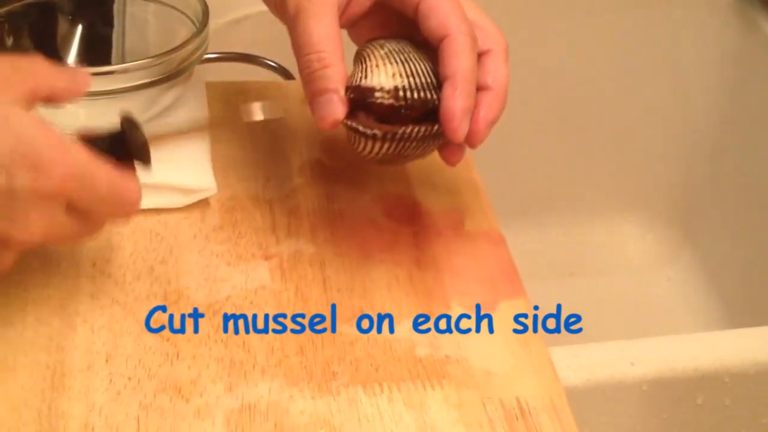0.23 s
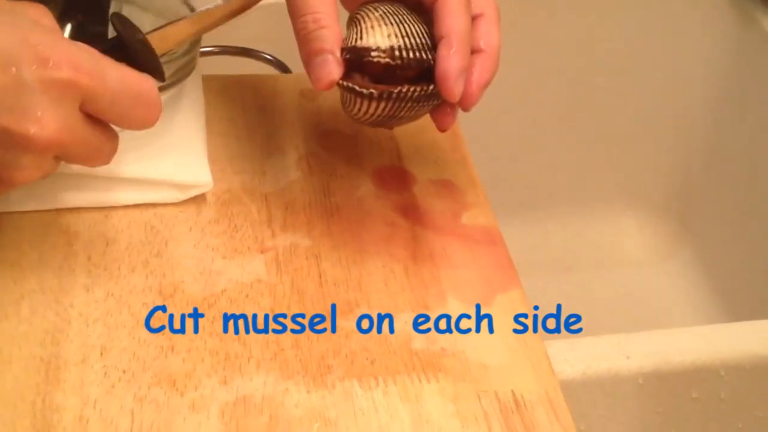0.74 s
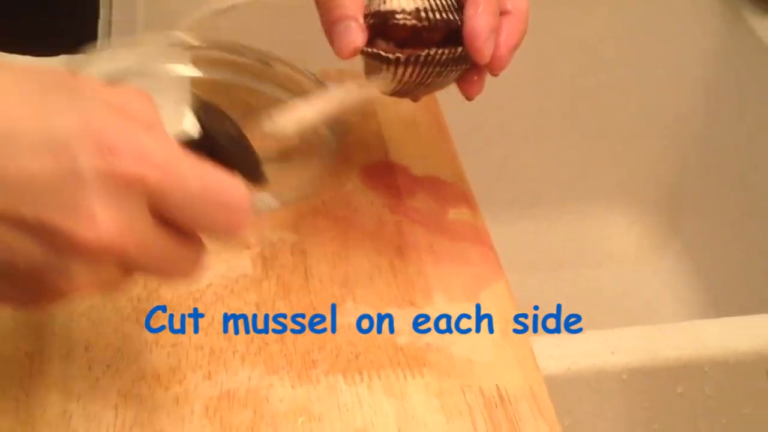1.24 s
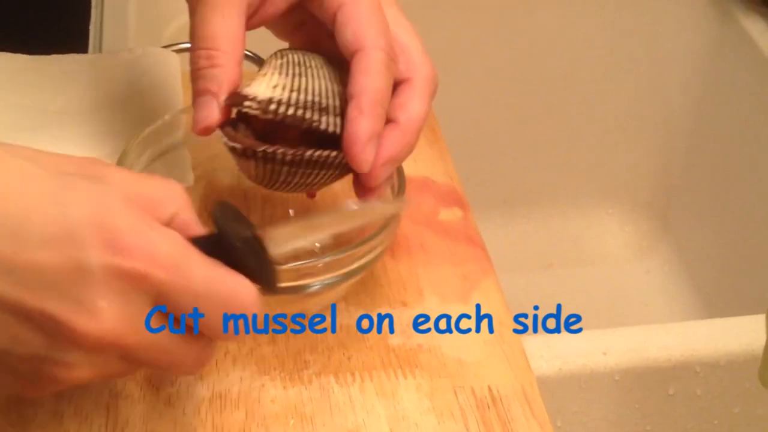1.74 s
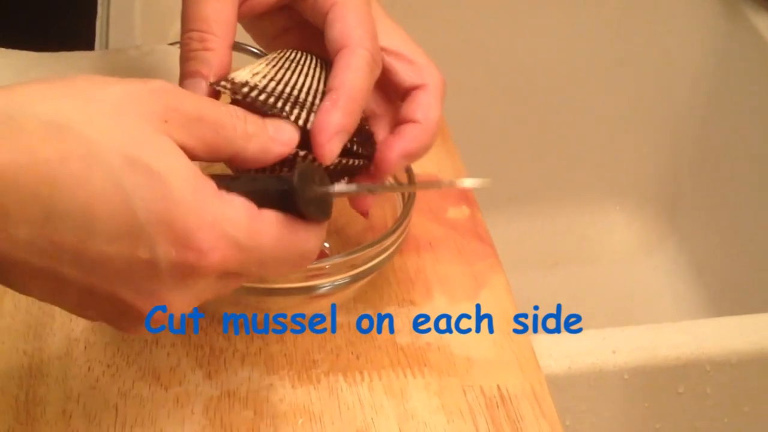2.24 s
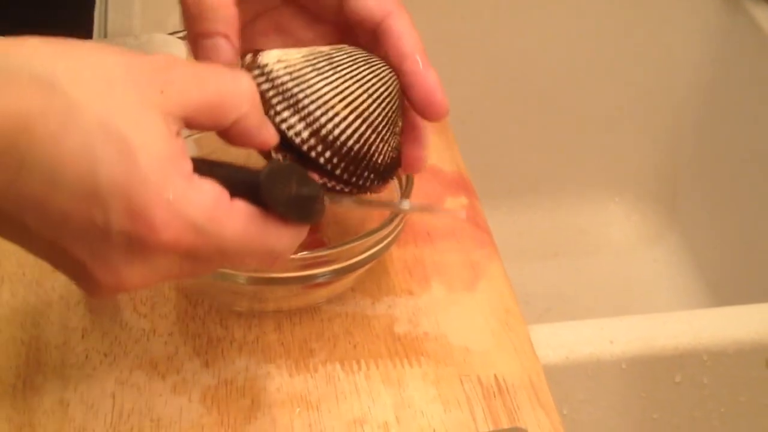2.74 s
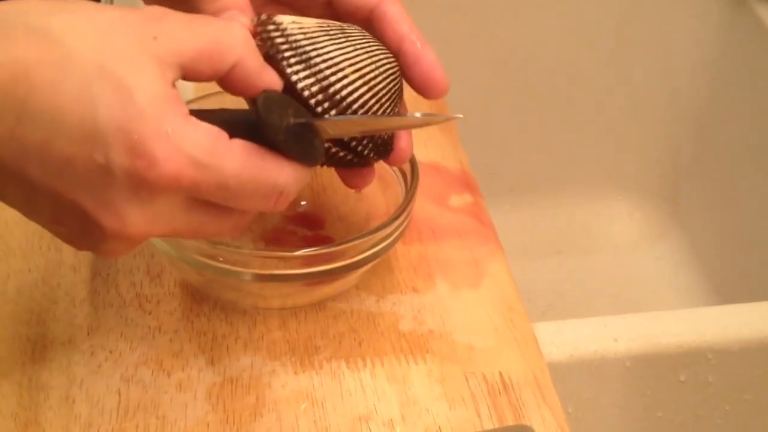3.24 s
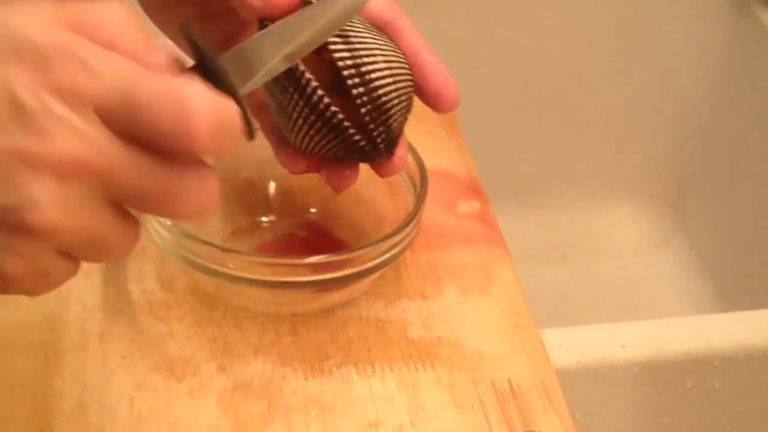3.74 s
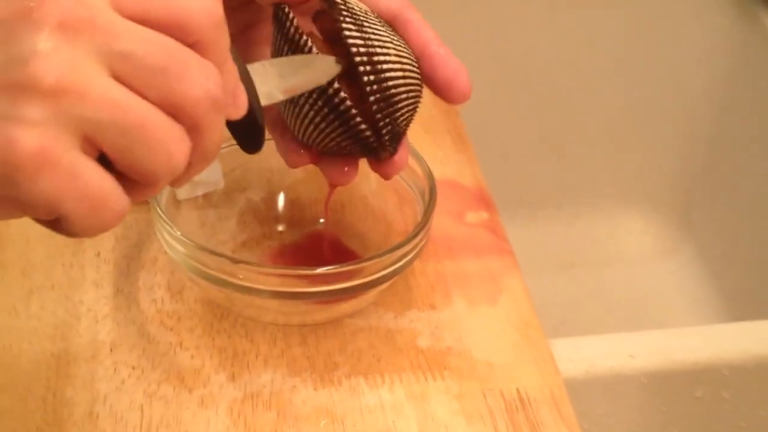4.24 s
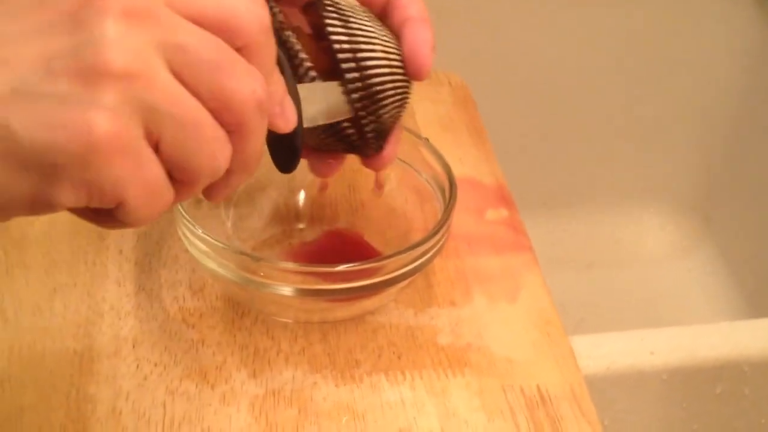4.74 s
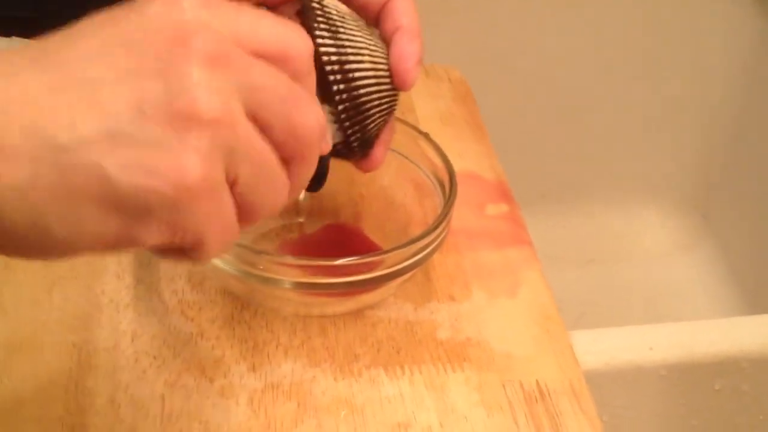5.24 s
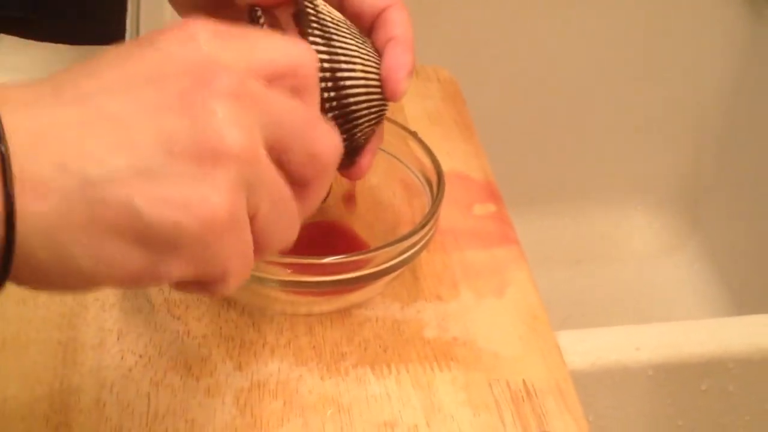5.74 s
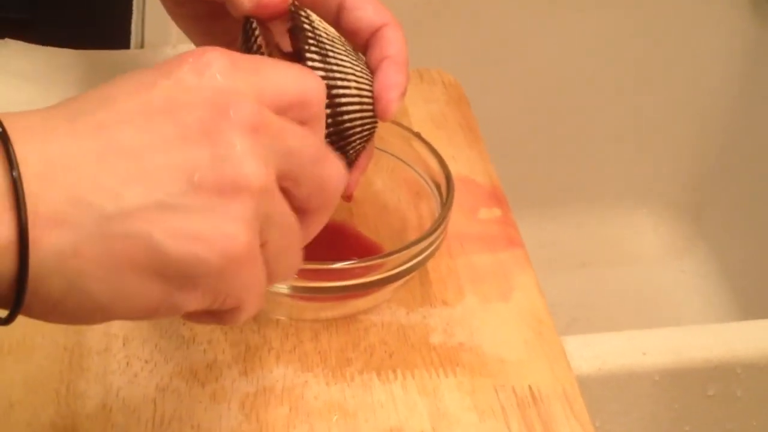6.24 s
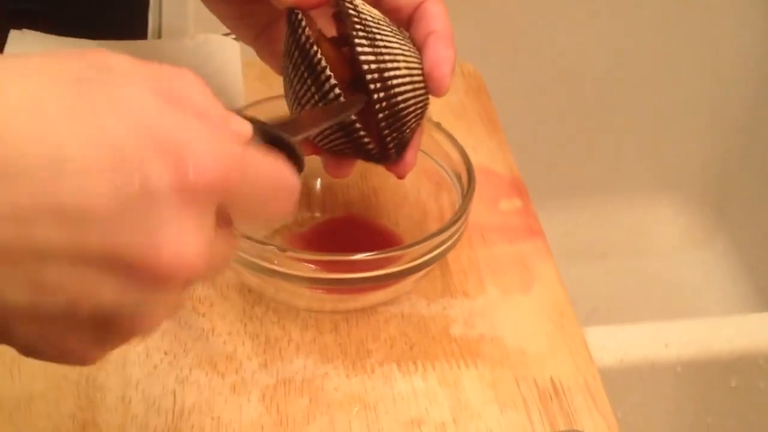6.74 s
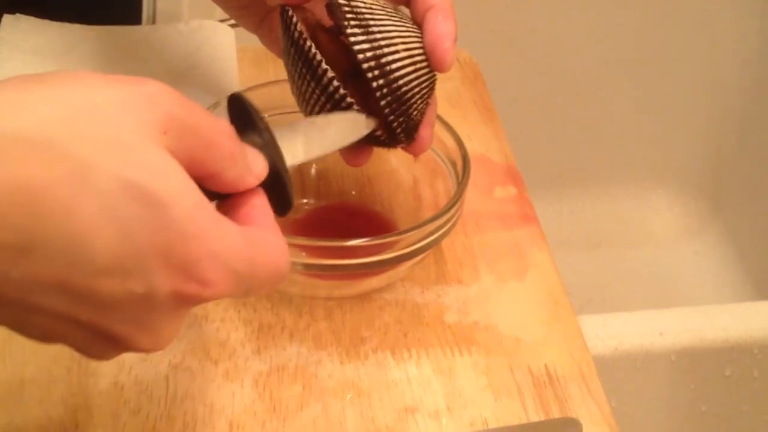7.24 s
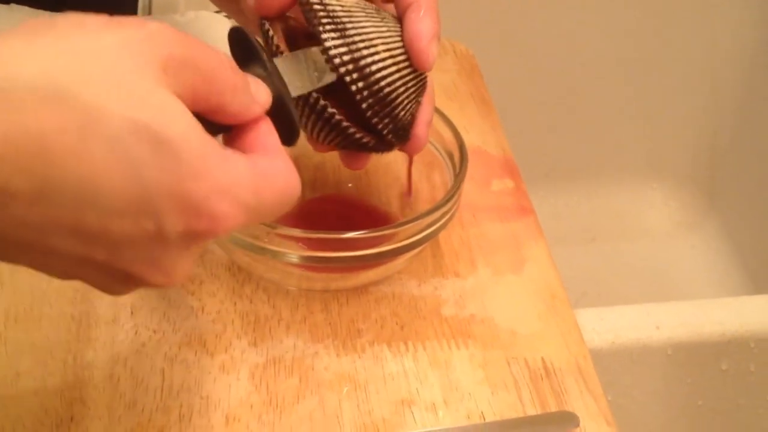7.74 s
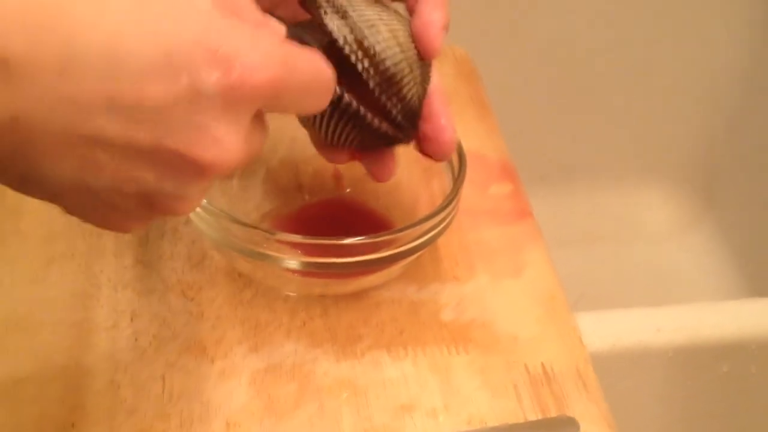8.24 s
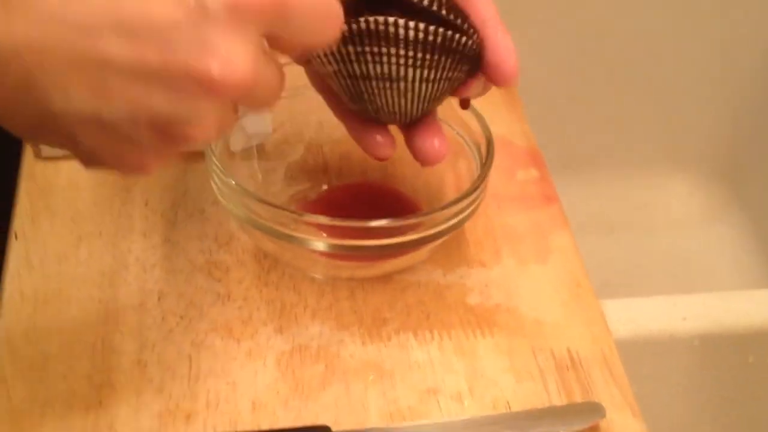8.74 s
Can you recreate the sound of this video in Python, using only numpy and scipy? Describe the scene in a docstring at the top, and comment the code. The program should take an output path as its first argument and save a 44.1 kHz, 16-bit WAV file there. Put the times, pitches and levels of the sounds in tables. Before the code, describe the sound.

In a quiet kitchen with a faint appliance hum, a knife taps a clam shell once. A glass bowl knocks twice on a wooden board and rings briefly. After a few tiny wet ticks, the blade grates softly into the shell and slips off its ribs in sharp, irregular clicks, with another bowl knock midway. The clicks peak in a quick cluster near the end, then a few light taps fade. Everything sounds close.

```python
"""A ribbed clam is cut open with an oyster knife over a glass bowl on a wooden board, in a quiet kitchen.
Over the hum of an appliance, the blade taps the shell's lip. The bowl knocks twice on the board, and wet
flesh ticks faintly. From about 4.6 s the blade grates through the gap between the valves and slips off
their ribs in sharp clicks that ring the shell; midway the bowl knocks a third time. The clicks peak just
after 8 s, the valve's ring drops as the muscle is cut, and a few last taps fade away."""
import sys
import numpy as np
from scipy import signal
from scipy.fft import rfft, irfft
from scipy.io import wavfile

SR = 44100
rng = np.random.default_rng(int(sys.argv[2]) if len(sys.argv) > 2 else 0)


def dump(signal):
    """Clip the signal to [-1, 1] and save it as 16-bit WAV at the path in sys.argv[1]."""
    limited = np.clip(np.atleast_2d(signal).T, -1, 1)
    pcm = np.round(limited * 32767).astype(np.int16)
    wavfile.write(sys.argv[1], SR, pcm)


N = 396900

# The tone colour of steel on shell. Each row: frequency in Hz, level in dB.
STEEL_ON_SHELL = [(100, -47), (500, -28), (900, -5), (1400, -4.5), (2100, -9), (3000, 3.5), (3750, -2),
                  (4700, 5), (5600, -3.5), (6700, 2.5), (7900, -3.5), (9000, -9), (10500, -6),
                  (13300, -7.5), (16000, -23)]
# The shell's resonances. Each row: pitch in Hz, level in dB, ring time (t60) in seconds.
SHELL_MODES = [(1800, -8, 0.048), (2140, 6, 0.0045), (2420, 3.5, 0.011), (3010, 9, 0.01),
               (4200, -10.5, 0.013), (4620, -9.5, 0.0088), (6310, -13, 0.0085), (6200, 1.5, 0.015),
               (7700, -18.5, 0.016)]


def slips(valve_db=-1, blade_db=-5, valve_cycles=29, blade_cycles=30):
    """The blade slips off a rib inside the gap, ringing valve and blade at pitches set by the grip."""
    # Each row: start in seconds, contact energy in dB, treble lift in dB, slide time in seconds,
    # relative valve ring in dB.
    rib_slips = [(4.664, -20, 4, 0.0038, -29), (4.687, -23.5, 4, 0.002, -22.5),
                 (4.8047, -22.5, 4, 0.0071, -19), (4.904, -21, -10, .003, -17.5),
                 (5.0174, -31, 4, .002, -38), (5.323, -15.5, 7.5, 0.0058, -16),
                 (5.4328, -19.5, -8, 0.0026, -15), (5.553, -15.5, -3, 0.0041, -17),
                 (5.6478, -18, 5.5, 0.0027, -9.5), (5.699, -23.5, -27, 0.0028, -16),
                 (5.7748, -12.5, 2, 0.0038, -3.5), (5.9199, -20, -8, .0026, -22.5),
                 (6.045, -21.5, -5.5, 0.0043, -18.5), (6.158, -18, 0, .008, -12.5),
                 (6.2815, -17.5, -8, 0.0045, -12), (7.0336, -33.5, -2, .0046, -51),
                 (7.547, -23.5, 5, 0.0095, -20.5), (7.575, -21.5, -3, 0.0032, -34),
                 (7.7, -17.5, 7.5, 0.01, -18.5), (7.7433, -10, 6.5, 0.0041, -8.5),
                 (7.769, -10.5, -1, 0.0022, -2), (7.812, -15, -3.5, 0.0024, -7),
                 (8.0442, -6, -8.5, 0.0071, 2.5), (8.0604, -7.5, -19, 0.0063, 4),
                 (8.0756, -1, 7, 0.0053, -8), (8.0868, 6, 2, 0.0048, -25), (8.1828, -7.5, 3, 0.0025, -17),
                 (8.5282, -12.5, -3, 0.0024, -24.5), (8.5554, -20.5, 5, .001, -41)]
    # The blade works round the shell; the valve's pitch drops once the muscle is cut.
    # Each row: time in seconds, valve pitch in Hz, blade pitch in Hz.
    grip = [(4.65, 1910, 5960), (5.55, 1796, 6250), (6.2, 1830, 6430), (7.58, 1930, 6360),
            (7.77, 1786, 8000), (8.05, 1773, 7300), (8.18, 1440, 7270), (8.53, 1350, 6280)]
    times, valve_hz, blade_hz = np.transpose(grip)
    out = np.zeros(N)
    for start, energy_db, lift_db, slide_s, ring_db in rib_slips:
        valve = damped_note(np.interp(start, times, valve_hz), valve_cycles)
        blade = damped_note(np.interp(start, times, blade_hz), blade_cycles)
        notes = [(ring_db + valve_db, valve), (energy_db + blade_db, blade)]
        add(out, start, click(energy_db, lift_db, slide_s, notes))
    return out


def taps(lip_db=-1, blade_db=-3, lip_cycles=22, dull_share=0.18, contact_s=0.0029):
    """The blade strikes the shell's free lip from outside and both ring; a dull tap rings the blade less."""
    # Each row: start in seconds, contact energy in dB, treble lift in dB, lip pitch in Hz,
    # relative lip ring in dB.
    lip_taps = [(0.0526, -10.5, 1.5, 3020, -20), (6.2065, 1.5, 0, 3455, 1.5), (6.552, -34.5, 1, 2900, -23),
                (8.355, -19, -22, 2620, -16), (8.406, -8, -9.5, 2660, -14), (8.736, -24, -2.5, 2390, -15.5),
                (8.823, -40, -14, 2180, -29.5)]
    # The blade, clear of the flesh. Each row: pitch in Hz, level in dB, ring time in seconds.
    blade_modes = [(4020, 1, 0.0026), (6160, -0.5, 0.006)]
    out = np.zeros(N)
    for start, energy_db, lift_db, lip_hz, ring_db in lip_taps:
        blade = ring(blade_modes, .02, 0.000067)
        lip = damped_note(lip_hz, lip_cycles)
        notes = [(ring_db + lip_db, lip), (energy_db + blade_db + dull_share * lift_db, blade)]
        add(out, start, click(energy_db, lift_db, contact_s, notes))
    return out


def click(energy_db, lift_db, slide_s, notes, shell_db=-7, bite_s=.001):
    """A spray of fractures, heard directly, through the shell and through the notes (dB, ring) it shakes."""
    t = np.arange(SR // 12) / SR
    spray = grit(len(t), per_s=14000, spread_db=1.5)
    spray *= np.exp(-t / (2 * slide_s)) * (1 - np.exp(-t / bite_s))
    contact = pulse(STEEL_ON_SHELL, lambda hz: lift_db * np.clip((hz - 6000) / 4500, 0, 1))
    shell = ring(SHELL_MODES, .06, 0.00051)
    paths = [(energy_db, contact), (energy_db + shell_db, shell)] + notes
    return sum(gain_of(db) * unit(signal.fftconvolve(spray, body)[:len(t)]) for db, body in paths)


def grating(level_db=-4.5, shell_db=-2, valve_db=-6, valve_hz=1920, valve_cycles=16, chip_cycles=16):
    """The edge drags through the gap: chips break off, each with a brief pitch, and shake shell and valve."""
    # Pushes of the blade. Each row: start in seconds, length in seconds, relative level in dB.
    pushes = [(4.578, .05, -53.5), (4.615, .11, -52), (4.612, 0.8, -58.5), (4.858, 0.14, -46.5),
              (5.087, 0.11, -50.5), (5.181, 0.044, -43.5), (5.325, 0.052, -41.5), (5.482, 0.24, -55.5),
              (5.752, 0.1, -45), (6.16, 0.07, -38), (7.091, 0.082, -46), (7.752, 0.089, -44),
              (8.015, .04, -52), (8.055, 0.048, -30.5), (8.91, 0.15, -55)]
    pressure = sum(gain_of(db) * swell(start, length) for start, length, db in pushes)
    chips = np.zeros(N)
    for hz in np.geomspace(1900, 14500, 14):
        fractures = grit(N, per_s=400, spread_db=3.5)
        chip = ring([(hz, 0, chip_cycles / hz)], .02, 1 / hz)
        chips += gain_of(curve_at(STEEL_ON_SHELL, hz)) * np.sqrt(hz) * signal.oaconvolve(fractures, chip)[:N]
    out = pressure * evened(chips)
    shell = ring(SHELL_MODES, .1, .0001)
    valve = damped_note(valve_hz, valve_cycles)
    for db, body in [(shell_db, shell), (valve_db, valve)]:
        scrape = pressure * grit(N, per_s=2000, spread_db=3.1)
        out += gain_of(db) * signal.oaconvolve(scrape, body)[:N]
    return gain_of(level_db) * out


def bowl(rock_t60=0.018, rock_db=-1, crack_db=-13, thud_db=-11, chatter_s=0.006):
    """The bowl touches with one edge, lands fully and chatters to rest; glass and board ring on."""
    # Each row: start in seconds, relative touch level in dB, touch pitch in Hz, landing delay in seconds,
    # landing level in dB, hardness in dB per octave, board ring in dB, glass ring in dB.
    knocks = [(1.5467, 10.5, 1064, 0.0042, 12, 1, 6.5, -6), (1.8756, 6, 1322, 0.0042, 15, -2.5, 10, 2),
              (6.313, 5, 890, .005, 9, -1.5, 4, -0.5)]
    # A knock's force as the board passes it on. Each row: frequency in Hz, level in dB.
    thud_spectrum = [(40, -49.5), (90, -29), (170, -9.5), (230, -6.5), (400, -12.5), (530, -4.5),
                     (1000, -1.5), (1400, -0.5), (2000, -9.5), (2900, -12), (3600, -24), (6000, -33),
                     (10000, -42.5), (16000, -58.5)]
    # The board, and the glass it damps. Each row: pitch in Hz, level in dB, ring time in seconds.
    board_modes = [(195, -16.5, .2), (236.9, -13.5, 0.13), (277, -9, .2), (326, -9.5, .3), (497, -7.5, .17),
                   (568, 2.5, 0.13), (587, -3, .24), (727, -2, .19), (763, -8.5, 0.16), (976, -1, .2),
                   (989, -5.5, 0.27), (1041, -1, 0.21), (1138, -8, .22), (1425, -5, 0.16), (1440, -6, 0.18),
                   (1596, -6, .17), (1690, -8, 0.1), (2110, 2, 0.081), (2196, -12, 0.25), (2660, -11, 0.11),
                   (2885, -13, .17), (2940, -6.5, 0.11)]
    glass_modes = [(1247, 0, 0.39)]
    blows, ringing = np.zeros((2, N))
    t = np.arange(SR // 10) / SR
    for start, touch_db, touch_hz, delay, land_db, hardness, board_db, glass_db in knocks:
        thud = pulse(thud_spectrum, lambda hz: hardness * np.log2(1 + hz / 1000))
        bounces = grit(len(t), per_s=5000, spread_db=1.7) * np.exp(-t / chatter_s)
        chatter = unit(signal.fftconvolve(bounces, thud))
        add(blows, start, gain_of(touch_db + rock_db) * ring([(touch_hz, 0, rock_t60)], 0.073, 0.00046))
        add(blows, start, gain_of(touch_db + crack_db) * thud)
        add(blows, start + delay, gain_of(land_db + thud_db) * thud)
        add(blows, start + delay, gain_of(land_db) * chatter)
        add(ringing, start, gain_of(board_db) * ring(board_modes, .6, 0.004))
        add(ringing, start, gain_of(glass_db) * ring(glass_modes, .6, 0.0026))
    return blows, ringing


def flesh(film_t60=0.0048, snap_db=-3):
    """As the flesh parts, wet films burst in little clusters, each with a short high note."""
    # Each row: start in seconds, energy in dB, pitch in Hz.
    wet_ticks = [(0.3898, -35.5, 10550), (2.122, -44, 4000), (2.2427, -43, 6160), (3.114, -39, 6430),
                 (3.3334, -38, 6260), (3.3741, -43, 6400), (4.393, -28.5, 5500)]
    out = np.zeros(N)
    t = np.arange(SR // 20) / SR
    for start, db, hz in wet_ticks:
        pops = grit(len(t), per_s=1500, spread_db=2.3) * np.exp(-t / 0.0053)
        film = ring([(hz, 0, film_t60)], .03, 0.00021)
        add(out, start, gain_of(db) * unit(signal.fftconvolve(pops, film)))
        add(out, start, gain_of(db + snap_db) * unit(np.diff(pops)))
    return out


def rubbing(bend=.06):
    """Soft, grainy rubbing that narrows into a squeak where it rings; pressure bends its pitch up."""
    # Each row: start in seconds, length in seconds, level in dB, centre in Hz, ring time in seconds.
    rubs = [(0.447, 0.088, -58.5, 3550, 0.00093), (0.458, 0.5, -71.5, 4340, 0.0013),
            (6.803, .4, -75, 4900, .015), (7.14, 0.33, -69.5, 5220, .012), (7.09, 0.05, -54, 3160, 0.0076),
            (7.431, 0.059, -56, 3050, 0.019)]
    grain = grit(N, per_s=5000, spread_db=1.5)
    out = np.zeros(N)
    for start, length, db, hz, t60 in rubs:
        pressure = swell(start, length)
        pitch_hz = hz * (1 + bend * (pressure - .5))
        carrier = np.exp(2j * np.pi * np.cumsum(pitch_hz) / SR)
        feedback = np.exp(-np.log(1000) / (t60 * SR))
        squeak = carrier * signal.lfilter([1], [1, -feedback], grain / carrier)  # a gliding resonance
        out += gain_of(db) * pressure * evened(squeak.real)
    return out


def kitchen(sound, count=3, turn_hz=3.7):
    """The shell turns in the hand, so each blow meets a different blend of echoes."""
    turn = 2 * np.pi * turn_hz * np.arange(N) / SR
    blends = [np.sqrt(2 / count) * np.cos(turn + np.pi * k / count) for k in range(count)]
    return sum(signal.oaconvolve(sound * blend, reflections())[:N] for blend in blends)


def reflections(first_s=0.0016, build_s=0.002, echoes_per_s=5000):
    """Dense echoes off sink and walls, each band dying at its own speed."""
    # Each row: frequency in Hz, reverb time in seconds.
    reverb_times = [(150, 0.46), (500, .27), (1300, 0.25), (3000, 0.22), (7000, .24), (14000, 0.2)]
    echoes = rng.choice([-1., 1.], SR // 2) * (rng.random(SR // 2) < echoes_per_s / SR)
    hz, t, bands = signal.stft(echoes, SR, nperseg=256)
    decay = np.exp(-np.log(1000) * t / curve_at(reverb_times, hz)[:, None])
    tail = signal.istft(bands * decay, SR, nperseg=256)[1]
    fade_in = np.clip((np.arange(len(tail)) / SR - first_s) / build_s, 0, 1)
    return unit(tail * fade_in)


def room_tone(air_db=-58, flutter_rate_hz=45, waver_rate_hz=22):
    """A steady bed of air under the wavering, fluttering tones of an appliance motor."""
    # Each row: frequency in Hz, relative noise density in dB.
    air_spectrum = [(25, -13.5), (62, -22.5), (84, -3), (115, -8), (145, -3), (250, -1), (330, 0.5),
                    (700, -4.5), (1500, -12.5), (2600, -17), (3600, -24), (7000, -27), (10000, -33.5),
                    (14500, -28.5), (16000, -38.5)]
    # Each row: pitch in Hz, rms level in dB, waver depth in Hz, flutter as a share of the level.
    motor_tones = [(391, -63.5, 3.9, 0.22), (525, -73.5, 2.8, 0.36), (573, -75, 3, .4), (2310, -81, 4, .4),
                   (2738, -71, 11, 0.55), (4540, -88.5, 3, .3)]
    colour = gain_of(curve_at(air_spectrum, np.fft.rfftfreq(N, 1 / SR)))
    out = gain_of(air_db) * evened(irfft(rfft(rng.standard_normal(N)) * colour, N))
    for hz, db, waver, flutter in motor_tones:
        tone = np.sin(2 * np.pi * np.cumsum(hz + waver * drift(waver_rate_hz)) / SR)
        out += gain_of(db) * evened((1 + flutter * drift(flutter_rate_hz)) * tone)
    return out


def swell(start, length, peak_share=0.38, curve=1.22):
    """The pressure of one push: it builds to a peak and lets go."""
    progress = (np.arange(N) / SR - start) / length
    return np.interp(progress, [0, peak_share, 1], [0, 1, 0]) ** curve


def ring(modes, length_s, rise_s):
    """Dying sines with a soft attack, energy 1."""
    t = np.arange(int(length_s * SR)) / SR
    sines = sum(gain_of(db) * np.exp(-np.log(1000) * t / t60) * np.sin(2 * np.pi * (hz * t + rng.random()))
                for hz, db, t60 in modes)
    return unit(sines * (1 - np.exp(-t / rise_s)))


def damped_note(hz, cycles):
    """One note that hand and flesh damp by 60 dB within so many cycles."""
    return ring([(hz, 0, cycles / hz)], .06, 1 / hz)


def pulse(spectrum, tilt_db, size=2048):
    """The tightest causal pulse with this spectrum and tilt, energy 1."""
    hz = abs(np.fft.fftfreq(size, 1 / SR))
    log_gain = np.log(gain_of(curve_at(spectrum, hz) + tilt_db(hz)))
    minimum_phase = np.exp(np.conj(signal.hilbert(log_gain)))
    return unit(np.fft.ifft(minimum_phase).real)


def grit(samples, per_s, spread_db):
    """Tiny impulses at random moments, a few much larger than the rest, rms 1."""
    chance, size, sign = rng.random((3, samples))
    strength = gain_of(spread_db * np.minimum(-np.log(1 - size), 4))
    return evened((chance < per_s / SR) * strength * np.sign(sign - .5))


def drift(rate_hz):
    """Random wander, rms 1, with a new value rate_hz times a second."""
    values = rng.standard_normal(2048)
    return evened(np.interp(rate_hz * np.arange(N) / SR, np.arange(len(values)), values))


def gain_of(db):
    """Decibels to gain."""
    return 10 ** (np.asarray(db) / 20)


def evened(x):
    """Scales to rms 1."""
    return x / np.sqrt(np.mean(x ** 2) + 1e-20)


def unit(x):
    """Scales to energy 1."""
    return x / np.sqrt(np.sum(x ** 2) + 1e-20)


def curve_at(points, hz):
    """Reads a table along a log-frequency axis."""
    point_hz, values = np.transpose(points)
    return np.interp(np.log(hz + 1), np.log(point_hz), values)


def add(mix, start_s, sound):
    """Mixes a sound in at its start time."""
    part = mix[round(start_s * SR):][:len(sound)]
    part += sound[:len(part)]


def scene(bowl_room_db=-6.5, knife_room_db=-6):
    """Knife and bowl close by, with the kitchen around them."""
    knocks, ringing = bowl()
    knife = slips() + taps() + grating() + flesh() + rubbing()
    room = kitchen(gain_of(bowl_room_db) * knocks + gain_of(knife_room_db) * knife)
    return (knocks + ringing + knife + room + room_tone())[None]


def record(dry, ceiling=.8, low_cut_hz=72, high_cut_hz=16100):
    """Rounds off the highest peaks, then trims the rumble and the very top."""
    rounded = dry / (1 + (dry / ceiling) ** 6) ** (1 / 6)
    low_cut = signal.butter(4, low_cut_hz, "highpass", fs=SR, output="sos")
    high_cut = signal.firwin(511, high_cut_hz, window=("kaiser", 9), fs=SR)
    return signal.oaconvolve(signal.sosfilt(low_cut, rounded), high_cut[None], "same", axes=1)


dry = scene()
out = record(dry)
dump(out)
```